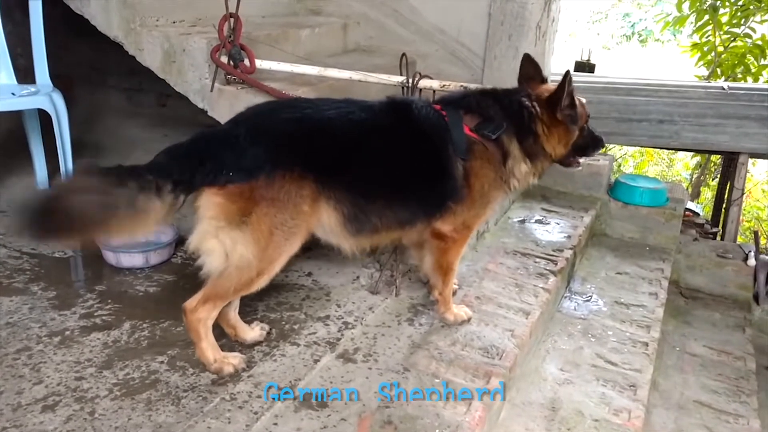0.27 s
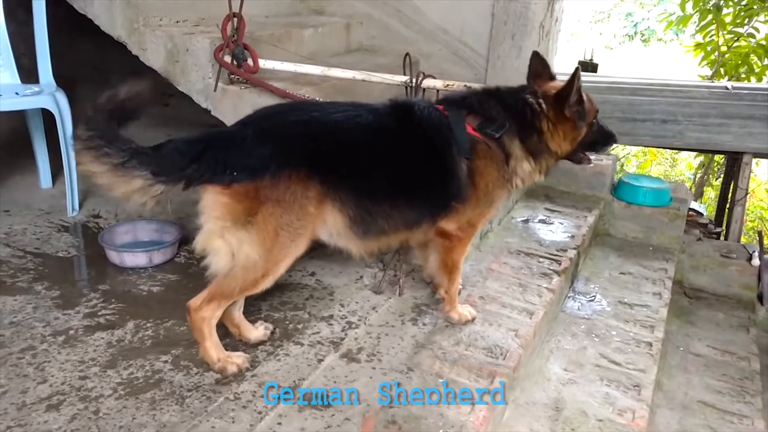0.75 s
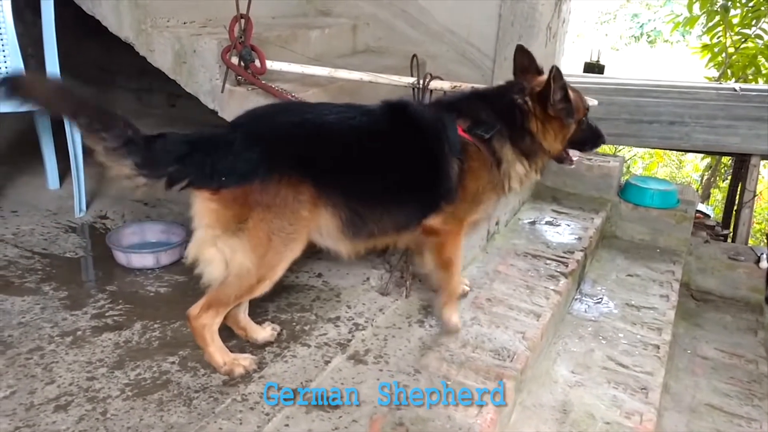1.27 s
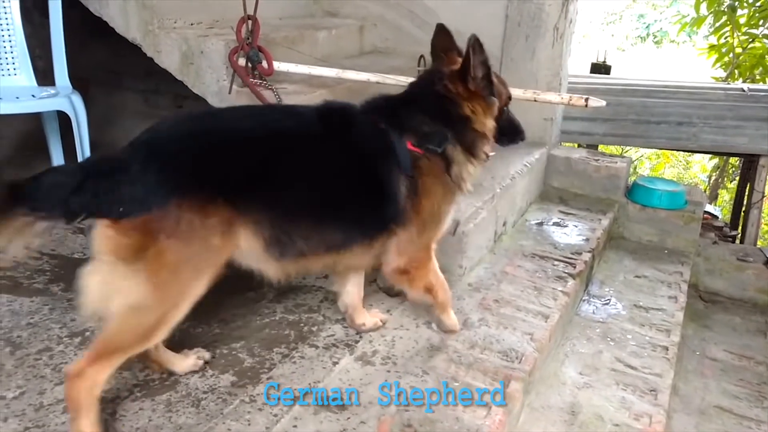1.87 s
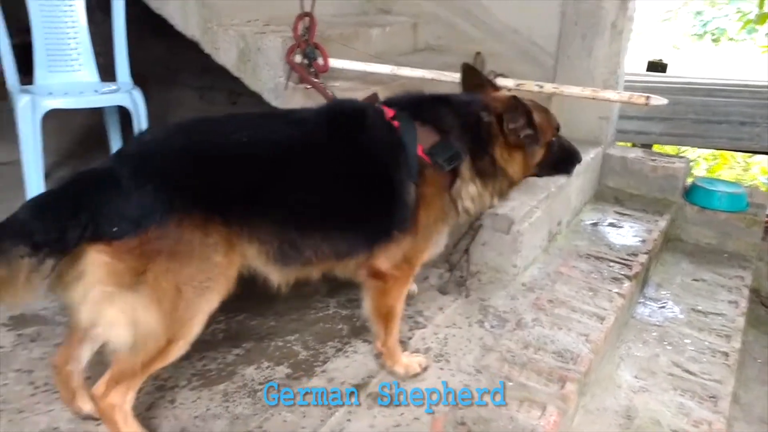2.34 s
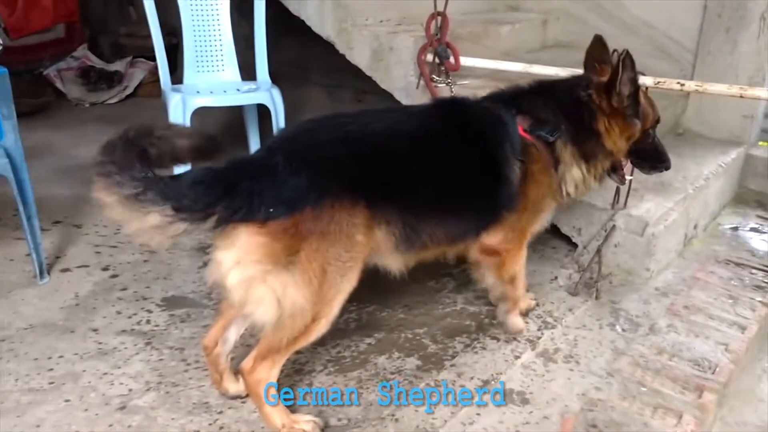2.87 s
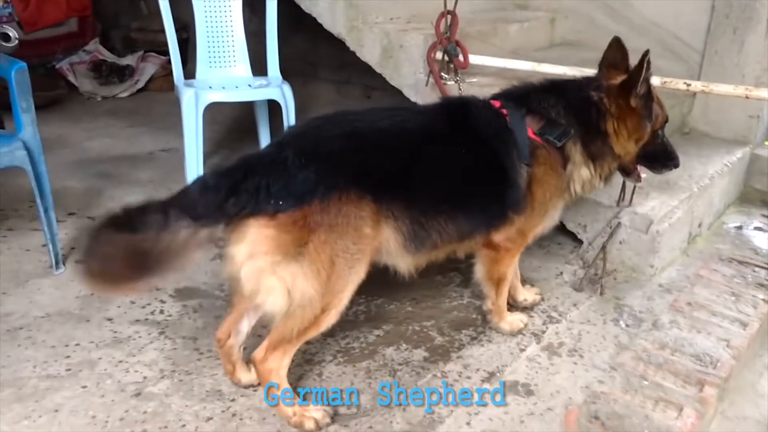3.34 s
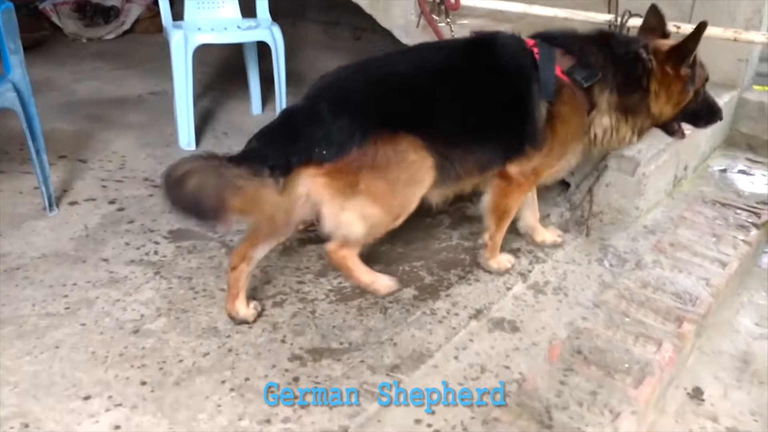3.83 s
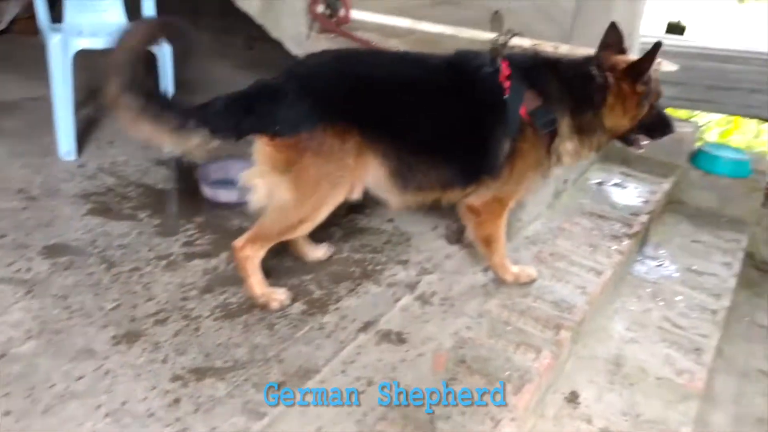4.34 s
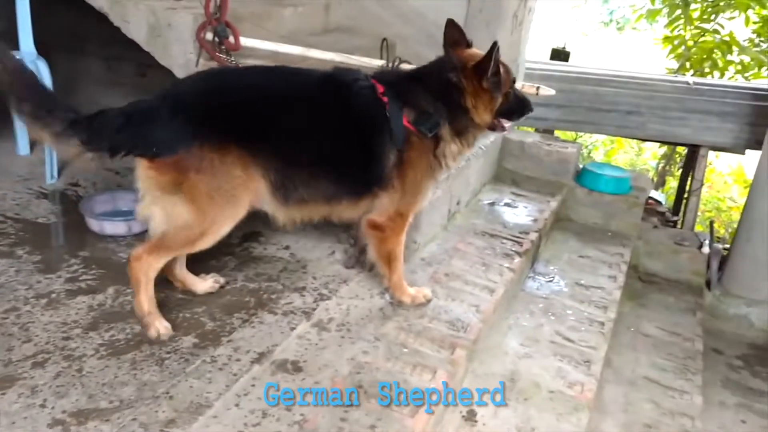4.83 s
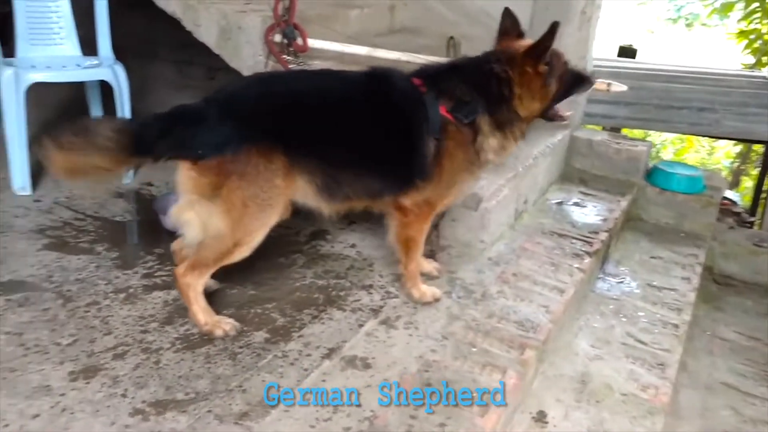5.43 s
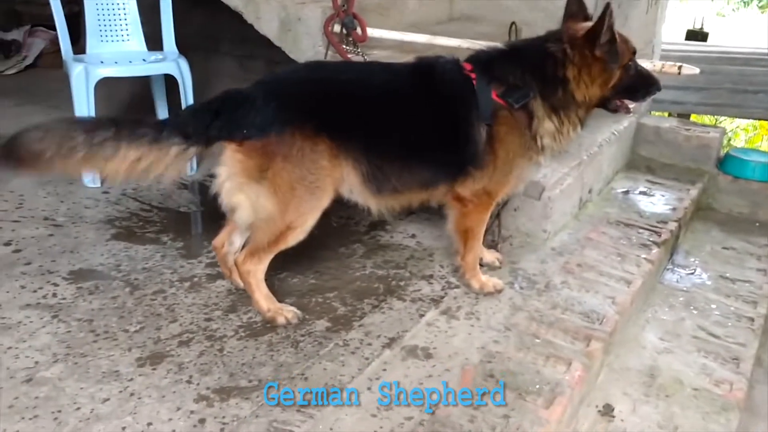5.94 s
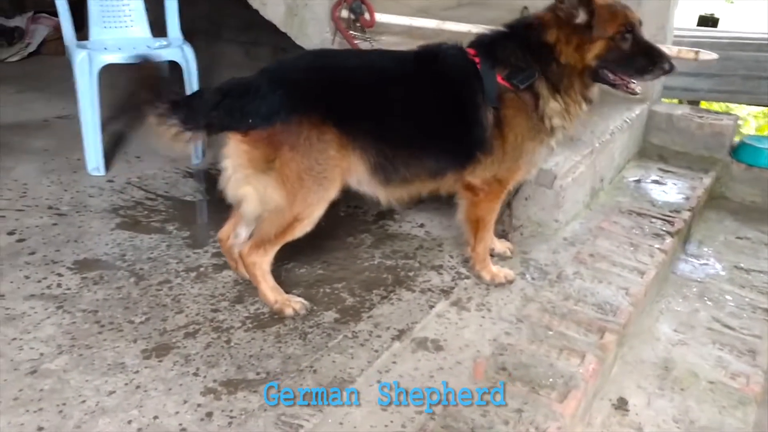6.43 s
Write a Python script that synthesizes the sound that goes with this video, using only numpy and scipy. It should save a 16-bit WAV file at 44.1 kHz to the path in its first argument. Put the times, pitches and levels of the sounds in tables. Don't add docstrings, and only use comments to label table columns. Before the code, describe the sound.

A large dog barks close by under a bare concrete porch, heard through a handheld stereo phone. The sound opens mid-bark with a dull handling thump, then full rough barks come at 0.1, 0.4, 0.75, 0.9 and 1.1 seconds, each arching up and falling, with a short hard ring of about half a second. A low closed-mouth grunt at 1.5 leads to a brighter bark at 1.8. Another grunt and a chain tick near 2.2 precede the loudest low woof at 2.3, another thump and a bark at 2.5. Barks follow at 2.8, 3.4, 3.9, 4.1 and 4.6. Around 5.1 the chain scrapes a step with tiny falling squeaks. A quick higher run comes at 5.4, 5.5, 5.8 and 6.1, then faint grunts as the ring fades. Thin high insect hiss and soft distant air continue throughout.

```python
import sys
import numpy as np
from scipy import signal
from scipy.fft import rfft, irfft, next_fast_len
from scipy.io import wavfile
from scipy.ndimage import uniform_filter1d, minimum_filter1d, map_coordinates

SR = 44100
rng = np.random.default_rng(int(sys.argv[2]) if len(sys.argv) > 2 else 0)


def voltage_ratio(level):
    return 10 ** (np.asarray(level, float) / 20)


def inscribe(sig):
    pcm = np.round(np.clip(np.atleast_2d(sig).T, -1, 1) * 32767)
    wavfile.write(sys.argv[1], SR, pcm.astype(np.int16))


N = 295029
LEAD = SR // 4

# freq_hz, density_db_per_hz
INSECT_SPECTRUM = [(6000, -60.5), (7200, -11.5), (8200, -12.5), (9000, -10.5), (9800, -14), (10800, -23.5),
                   (11800, -36), (12500, -63)]
# time_s, level_db
CHORUS_LEVEL = [
    (0, -64.5),
    (1.499, -66),
    (4.2, -62.5),
    (6.69, -64.5),
]
# freq_hz, density_db_per_hz
AIR_SPECTRUM = [(40, -60), (100, -8), (300, -6), (600, -6.5), (1200, -6.5), (2500, -14.5), (4000, -18.5),
                (7000, -24.5), (11000, -35), (12000, -58), (15000, -51)]
# time_s, peak_db, length_s
BUMPS = [
    (0.004, -32, 0.019),
    (2.34, -33.5, 0.017),
    (2.902, -59, .025),
]
# start_s, peak_db, pitch_hz, t60_s (held to 0.1 s at most)
LINK_TICKS = [
    (2.21, -51, 5400, 6.0),
    (3.9383, -66.5, 6140, 1.5),
    (5.1106, -60, 6530, 1.7),
]
# start_s, length_s, pitch_hz, level_db
SQUEAKS = [
    (5.11, 0.034, 3290, -65),
    (5.15, .11, 2920, -65),
    (5.24, 0.13, 2560, -66),
]
# freq_hz, t60_s
PORCH_DECAY = [(120, 0.65), (300, 0.49), (600, 0.41), (1500, 0.44), (3500, 0.45), (10000, 0.38)]
# freq_hz, level_db, t60_s
STANDING_WAVES = [(424.7, -54, 0.52), (551, -57, 0.42), (597.8, -46.5, 0.44), (877, -71.5, 0.98),
                  (1046, -62.5, 0.65)]
# freq_hz, likeness_ratio
PORT_LIKENESS = [(100, 0.99), (400, 0.91), (900, 0.52), (1800, 0.13), (5000, .05)]
# freq_hz, gain_db
FAR_PORT_SHADING = [(60, -0.5), (300, 1), (800, -0.5), (1800, -6.5), (8000, -15)]
# freq_hz, gain_db
THROAT = [(80, 16), (160, 6.5), (300, -6), (430, 3.5), (600, -1), (850, 8.5), (1100, 5), (1500, 5.5),
          (2000, -0.5), (2450, -11.5), (2800, -22.5), (3400, -32.5)]
# freq_hz, width_hz, gain_db
FORMANTS = [(499, 86, -5), (552.2, 49.6, 12.5), (1130, 143, 5.5), (1480, 83, -7), (2224, 57, 0)]
# freq_hz, density_db_per_hz
BREATH_SPECTRUM = [(2000, 1), (2800, -0.5), (3600, -5), (5000, 1), (7500, -3.5), (10000, -11.5),
                   (12000, -16.5), (13500, -22.5), (15300, -16)]
# start_s, swell_s, fade_s, pitch_hz, level_db
GRUNTS = [
    (1.46, 0.074, 0.076, 169.7, -24.5),
    (2.16, 0.059, 0.015, 134, -28),
    (3.2, 0.021, 0.09, 122.6, -41),
    (4.88, 0.007, 0.11, 106.6, -34),
    (6.45, .045, 0.013, 115, -40.5),
    (6.55, .03, .02, 116.3, -77),
]
# mouth_db, snarl_db, breath_db
GRUNT_COLOUR = (-7, -2.5, -20)
# start_s, climb_s, top_hz, end_hz, level_db
FRESH_BARKS = [
    (.125, .14, 430.3, 304.7, -17),
    (.745, 0.12, 397.8, 294.5, -17),
    (2.82, 0.12, 484.8, 306.6, -19),
    (3.89, .14, 509.7, 303, -19.5),
    (5.79, 0.12, 488, 306, -17),
]
# start_s, climb_s, top_hz, end_hz, level_db
BRIGHT_BARKS = [
    (1.764, .125, 502.6, 290, -19),
    (3.442, 0.16, 530.4, 400, -17.5),
    (4.62, .12, 531, 520, -20),
]
# start_s, climb_s, top_hz, end_hz, level_db
CHASING_BARKS = [
    (1.14, 0.086, 483.3, 320.3, -18.5),
    (2.47, 0.087, 500.5, 290, -20),
    (5.51, 0.051, 539, 381.8, -16),
    (6.092, .095, 533.2, 358, -21),
]
# start_s, climb_s, top_hz, end_hz, level_db
WOOFS = [
    (.375, .075, 373, 293, -15),
    (.925, .07, 352.6, 309, -17),
    (2.268, 0.0507, 335.5, 296.4, -11.5),
]
# start_s, climb_s, top_hz, end_hz, level_db
HIGH_START_BARKS = [
    (-.15, .07, 441.2, 408.7, -19),
    (4.09, .075, 448.8, 429.4, -17),
    (5.365, .085, 514.4, 338.4, -16),
]
# start_hz, hold_s, attack_db, release_db, mouth_db, snarl_db, lowest_tone_db
BARK_KINDS = [
    (111.74, 0.00501, 7, -5.5, 0, 0.5, -6.5),
    (113, .03, 4, -12, 1, 1.5, -0.5),
    (216.25, 0.01154, -4, -10, 2, 1, -1),
    (290, 0.0057, -15, -10.5, -2.5, 0, -11),
    (255.6, .025, -23, -10.5, -4.5, -2, 3),
]
# pitch_hz, chest_db, mouth_db, snarl_db, breath_db
STRAIN = [(110, -29, -22, -13, -25), (178, -17.5, -4.5, -0.5, -25), (304, -1, -6, -8, -22.5),
          (400, -1, 0.5, 4, -16), (520, -4.5, 5, 3, -14)]

DRAG_S, DRAG_DB, CATCH_S, SLIDE_S = 5.089, -52.5, 0.022, 0.051
GRUNT_HZ, GRUNT_IN_DB, GRUNT_OUT_DB = 115, -17, -11
ATTACK_S, DROP_S, DWELL_S = 0.053, 0.035, 0.015
CLIMB_BEND = 1.3
CLOSE_DB = -5
STOP_DB_PER_S = 1504
UNEVEN_DB, RASP_DB = 1.3, 3
CHEST_HZ = 70


def unit(x):
    return x / np.sqrt(np.mean(x ** 2) + 1e-20)


def along(points, hz):
    f, v = np.transpose(points)
    return np.interp(np.log(hz + 1), np.log(f + 1), v)


def wobble(n, rate_hz):
    knots = rng.standard_normal(int(n * rate_hz / SR) + 4)
    return map_coordinates(knots, [np.arange(n) * rate_hz / SR])


def filtered(x, response):
    m = next_fast_len(x.shape[-1] + 4096)
    return irfft(rfft(x, m) * response(np.fft.rfftfreq(m, 1 / SR)), m)[..., :x.shape[-1]]


def coloured(x, spectrum):
    return unit(filtered(x, lambda hz: voltage_ratio(along(spectrum, hz))))


def add(total, x, start_s):
    part = total[:, LEAD + round(start_s * SR):][:, :x.shape[1]]
    part += x[:, :part.shape[1]]


def played(rows, fade_s):
    s, *cols = np.transpose(rows)
    t = np.arange(s[0], s[-1] + fade_s, 1 / SR)
    ends = np.clip(np.minimum(t - t[0], t[-1] - t) / fade_s, 0, 1)
    return [np.interp(t, s, c) for c in cols], ends ** 2


def diffuse(pair):
    def blend(hz):
        angle = np.arccos(np.clip(along(PORT_LIKENESS, hz), -1, 1)) / 2
        return np.array([np.cos(angle), np.sin(angle)])

    mid, side = filtered(pair, blend)
    return np.array([mid + side, mid - side])


def porch(x, wet_db, lag_s):
    hz, t, z = signal.stft(rng.standard_normal((2, SR * 3 // 4)), SR, nperseg=256)
    swell = 1 - np.exp(-t / 0.0039)
    decay = voltage_ratio(-60 * t / along(PORCH_DECAY, hz)[:, None])
    tail = diffuse(signal.istft(z * swell * decay, SR, nperseg=256)[1])
    tail /= np.linalg.norm(tail[1])
    t = np.arange(tail.shape[1]) / SR
    for wave_hz, db, t60_s in STANDING_WAVES:
        phase = 2 * np.pi * wave_hz * t + rng.normal(0, 0.8, (2, 1)) + 2.2 * wobble(len(t), 30)
        tail += voltage_ratio(db - 60 * t / t60_s) * np.sin(phase)
    tail *= voltage_ratio(wet_db)
    tail[[0, 1], [round(abs(lag_s) * SR), 0]] += 1
    return signal.fftconvolve(x[None], tail, axes=1)


def outdoors():
    z = signal.stft(rng.standard_normal((2, N)), nperseg=256)[2]
    patches = uniform_filter1d(rng.standard_normal(z.shape[1:]), 4, 0)
    patches = unit(uniform_filter1d(patches, 4, 1))
    flicker = signal.istft(z * voltage_ratio(1.3 * patches), nperseg=256)[1][:, :N]
    chorus = coloured(flicker, INSECT_SPECTRUM)
    gusts = voltage_ratio(0.5 * wobble(N, 2.9) + wobble(N, 3.46))
    air = gusts * coloured(diffuse(rng.standard_normal((2, N))), AIR_SPECTRUM)
    chorus_db = np.interp(np.arange(N) / SR, *np.transpose(CHORUS_LEVEL)) + 0.51 * wobble(N, 3.3) + 8.0
    return voltage_ratio(chorus_db) * chorus + voltage_ratio(-59) * air


def hand():
    total, t = np.zeros((2, LEAD + N)), np.arange(-SR // 20, SR // 20) / SR
    for start_s, db, length_s in BUMPS:
        u = t / length_s * 4
        push = (1 - u ** 2) * np.exp(-u ** 2 / 2)
        add(total, voltage_ratio(db) * np.array([[0.8], [1]]) * push, start_s - 0.05)
    return total[:, LEAD:]


def link_tick(db, hz, t60_s):
    t = np.arange(SR // 10) / SR
    modes = [(1, 1), (1.33, 0.5), (1.55, 0.79), (2.1, 0.26)]
    ring = sum(gain * np.sin(2 * np.pi * hz * ratio * t) for ratio, gain in modes)
    click = voltage_ratio(db - 60 * t / 0.003) * rng.standard_normal(len(t))
    return voltage_ratio(db - 60 * t / np.clip(t60_s, 0.01, 0.1)) * ring + click


def squeak(length_s, hz, db):
    u = np.linspace(0, 1, round(length_s * SR))
    pitch_hz = hz * (1.02 - 0.036 * u + 0.065 * wobble(len(u), 307))
    phase = 2 * np.pi * np.cumsum(pitch_hz) / SR
    return voltage_ratio(db) * np.sin(np.pi * u) * (np.sin(phase) + 0.2 * np.sin(2 * phase))


def scrape():
    top_s = DRAG_S + CATCH_S
    rows = [(DRAG_S, DRAG_DB - 12), (top_s, DRAG_DB), (top_s + SLIDE_S, DRAG_DB - 19)]
    (db,), ends = played(rows, 0.02)
    grit = rng.standard_normal(len(db)) * voltage_ratio(1.5 * wobble(len(db), 150))
    spectrum = [(300, -17.5), (900, -1), (1800, -9.0), (3000, -18), (7000, -37.5), (9000, -50)]
    return voltage_ratio(db) * ends * coloured(grit, spectrum)


def chain():
    total = np.zeros((2, LEAD + N))
    for start_s, *tick in LINK_TICKS:
        add(total, porch(link_tick(*tick), wet_db=2, lag_s=0.0002), start_s)
    for start_s, *slip in SQUEAKS:
        add(total, porch(squeak(*slip), wet_db=3, lag_s=0.0002), start_s)
    add(total, porch(scrape(), wet_db=12, lag_s=0.0002), DRAG_S)
    return total[:, LEAD:]


def formants(hz):
    return 1 + sum(voltage_ratio(db) * 1j * hz * w / (c * c - hz * hz + 1j * hz * w) for c, w, db in FORMANTS)


def smear(n, share, rate_hz):
    share = np.clip(share, 0, 1)
    return np.sqrt(1 - share) + np.sqrt(share) * unit(wobble(n, rate_hz))


def call(rows, jitter, rough, hum_db):
    (pitch_hz, chest_db, mouth_db, snarl_db, breath_db), ends = played(rows, 0.012)
    n = len(ends)
    phase = 2 * np.pi * np.cumsum(pitch_hz * (1 + jitter * wobble(n, 163.6))) / SR
    order = np.arange(1, 25)[:, None]
    hz = order * pitch_hz
    lift_db = mouth_db * np.interp(hz, [782, 910, 1362, 1546], [0, 1, 1, 0])
    lift_db = lift_db + snarl_db * np.interp(hz, [1250, 1450], [0, 1])
    high = np.interp(hz, [760, 920], [0, 1])
    size = voltage_ratio(along(THROAT, hz) + lift_db)
    size /= np.sqrt(np.sum((size * abs(formants(hz))) ** 2 * (1 - high), 0) / 2)
    tones = size * np.cos(order * phase + 0.9 * order ** 2)
    folds = voltage_ratio(hum_db) * smear(n, rough * 0.61, 171.6) * tones[0]
    folds += smear(n, rough * 1.94, 218.6) * np.sum((tones * (1 - high))[1:], 0)
    folds += smear(n, rough, 502.3) * np.sum(tones * high, 0)
    puffs = rng.standard_normal(n) * (3.0 + (1 + np.cos(phase)) ** 2)
    breath = coloured(puffs, BREATH_SPECTRUM)
    voiced = filtered(voltage_ratio(chest_db) * ends * folds, formants)
    return voiced + voltage_ratio(chest_db + breath_db) * ends * breath


def grunt(start_s, swell_s, fade_s, hz, db):
    top_s = start_s + swell_s
    return [(start_s, GRUNT_HZ, db + GRUNT_IN_DB, *GRUNT_COLOUR),
            (top_s, hz, db, *GRUNT_COLOUR),
            (top_s + fade_s, 0.77 * hz, db + GRUNT_OUT_DB, *GRUNT_COLOUR),
            (top_s + fade_s + 0.02, 0.96 * hz, -100, *GRUNT_COLOUR),
            (start_s + 0.25, hz, -120, *GRUNT_COLOUR)]


def ease(u):
    return np.sin(np.pi / 2 * np.clip(u, 0, 1)) ** 2


def bark(start_s, climb_s, top_hz, end_hz, db, kind):
    start_hz, hold_s, attack_db, release_db, mouth_db, snarl_db, _ = kind
    step_s = 0.002
    t = np.arange(0, 0.28, step_s)
    after_top_s = t - climb_s - hold_s
    up = ease(t / climb_s) ** (CLIMB_BEND / 2)
    down = ease(after_top_s / DROP_S)
    pitch_hz = start_hz * (top_hz / start_hz) ** up * (end_hz / top_hz) ** down
    hz, *laws = np.transpose(STRAIN)
    chest, mouth, snarl, breath = [np.interp(np.log(pitch_hz), np.log(hz), law) for law in laws]
    chest = db + chest + attack_db * (1 - ease(t / ATTACK_S))
    chest += release_db * ease(after_top_s / (DROP_S + DWELL_S))
    chest -= STOP_DB_PER_S * np.maximum(after_top_s - DROP_S - DWELL_S, 0)
    chest += UNEVEN_DB * wobble(len(t), 30 * step_s * SR)
    breath = breath + RASP_DB * wobble(len(t), 60 * step_s * SR)
    mouth = mouth + mouth_db + CLOSE_DB * down
    snarl = snarl + snarl_db + CLOSE_DB * down
    return np.transpose([start_s + t, pitch_hz, chest, mouth, snarl, breath])


def dog():
    total = np.zeros((2, LEAD + N))
    for row in GRUNTS:
        voice = call(grunt(*row), jitter=0.021, rough=0.14, hum_db=-3.5)
        add(total, voltage_ratio(-9.0) * porch(voice, wet_db=-1, lag_s=0.00051), row[0])
    for table, kind in zip([FRESH_BARKS, BRIGHT_BARKS, CHASING_BARKS, WOOFS, HIGH_START_BARKS], BARK_KINDS):
        for row in table:
            voice = call(bark(*row, kind), jitter=0.011, rough=0.25, hum_db=kind[-1])
            radiated = filtered(voice, lambda hz: hz ** 4 / (hz ** 4 + CHEST_HZ ** 4))
            heard = porch(radiated, wet_db=-1, lag_s=0.00028)
            level = voltage_ratio(0.65) * np.linalg.norm(voice) / np.linalg.norm(heard[1])
            add(total, level * heard, row[0])
    return total[:, LEAD:]


def scene():
    return outdoors() + hand() + chain() + dog()


def two_ports(dry):
    far = filtered(dry[0], lambda hz: voltage_ratio(along(FAR_PORT_SHADING, hz)))
    near = dry[1]
    late = filtered(np.array([near, far]), lambda hz: np.exp(-2j * np.pi * hz * 0.0004))
    sides = np.array([far, near]) - 0.84 * late
    return filtered(sides, lambda hz: hz < 15300)


def limited(sides):
    need = np.minimum(1, 1.1 / (np.abs(sides).max(0) + 1e-9))
    gain = uniform_filter1d(minimum_filter1d(need, size=441), size=301)
    return np.clip(sides * gain, -1, 1)


def thinned_treble(x, from_hz, keep):
    hz, _, z = signal.stft(x, SR, nperseg=2048)
    size = np.abs(z).mean(0)
    strong = size > keep * uniform_filter1d(size, size=24, axis=0)
    return signal.istft(z * (strong | (hz < from_hz)[:, None]), SR, nperseg=2048)[1][:, :N]


def roll_off(x):
    return signal.sosfilt(signal.butter(12, 15360, fs=SR, output="sos"), x)


def record(dry):
    mix = thinned_treble(limited(two_ports(dry)), from_hz=11560, keep=1.2)
    return roll_off(mix)


dry = scene()
out = record(dry)
inscribe(out)
```